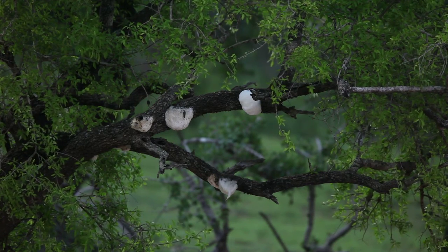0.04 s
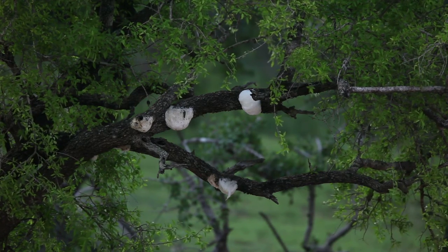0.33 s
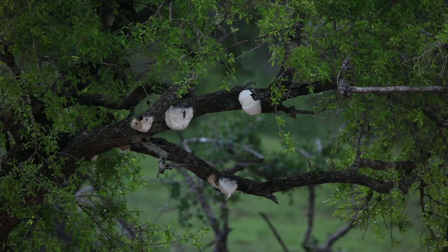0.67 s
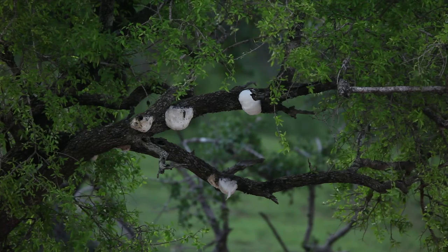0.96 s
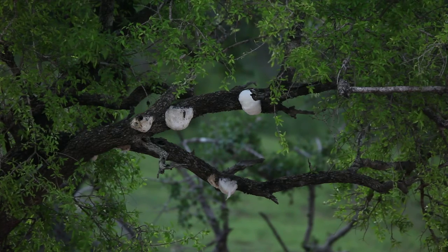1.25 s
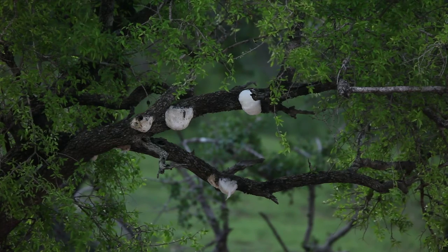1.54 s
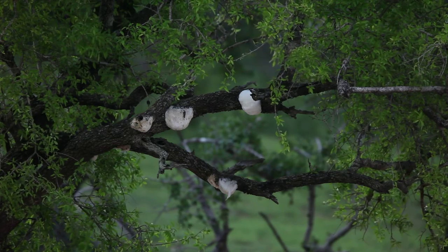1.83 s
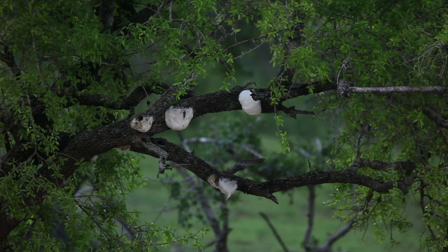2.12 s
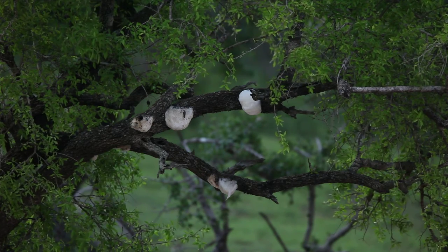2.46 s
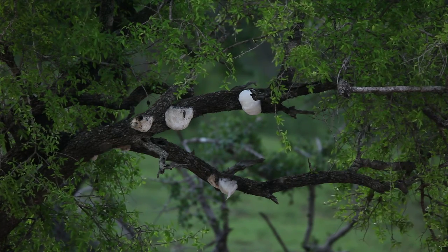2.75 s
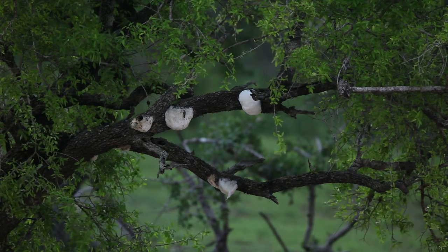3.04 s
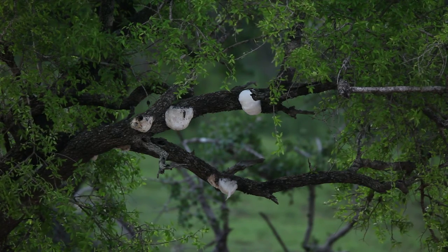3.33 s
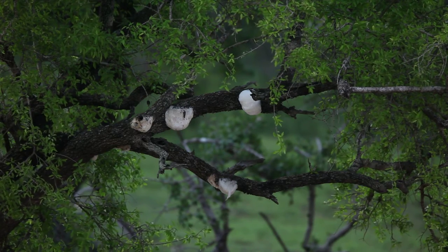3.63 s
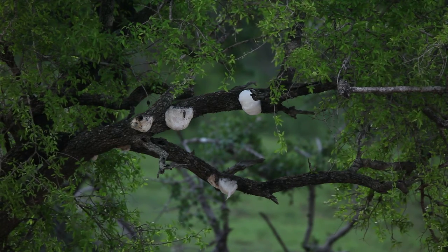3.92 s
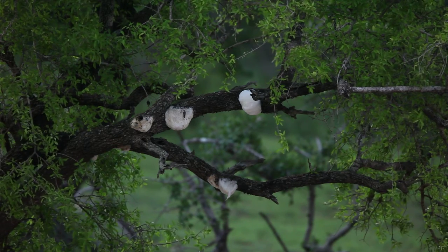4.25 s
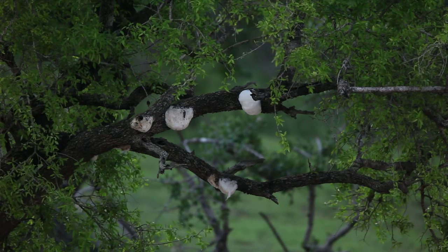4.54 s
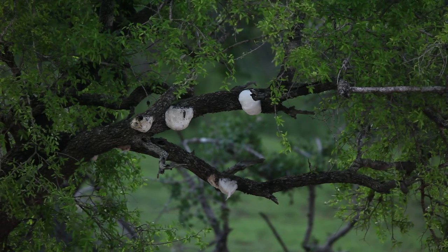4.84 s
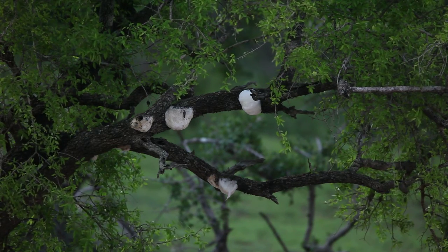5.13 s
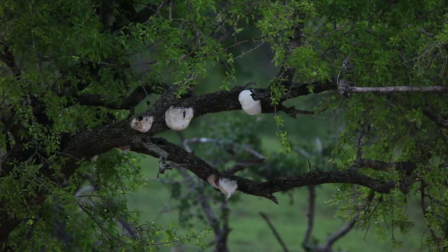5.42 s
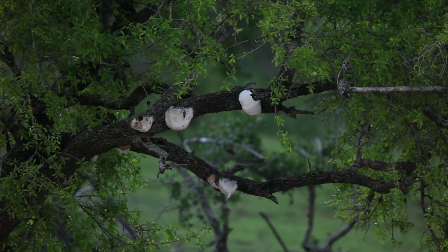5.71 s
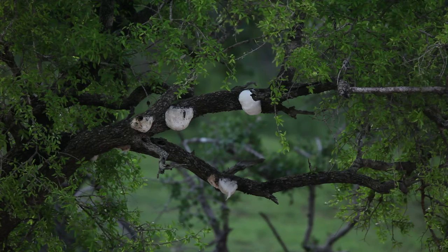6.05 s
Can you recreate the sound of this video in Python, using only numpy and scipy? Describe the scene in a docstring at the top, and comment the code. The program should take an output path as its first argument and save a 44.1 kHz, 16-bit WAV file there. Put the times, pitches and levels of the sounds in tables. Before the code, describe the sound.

Many frogs overlap with liquid rising whoops, dry rattles and shrill peeps outdoors, over faint insects and a soft breeze.

```python
"""A wetland at nightfall, one microphone in the open among a frog chorus. Dozens of frogs give liquid
whoops, tones swept upward through the vocal sac, a few of them close by. One rattles in long, dry click
trains, others peep and chuck, and grass and trees scatter their calls. Thin insect buzzes and brief
whistles sit above a faint rumble and a hiss of air that rises in the second half."""
import sys
import numpy as np
from scipy import signal
from scipy.fft import rfft, irfft
from scipy.io import wavfile

SR = 44100
rng = np.random.default_rng(int(sys.argv[2]) if len(sys.argv) > 2 else 0)


def file_out(sig):
    """Save sig as 16-bit WAV at sys.argv[1]."""
    # one column per channel
    cols = np.atleast_2d(sig).T
    # limit, then scale
    lim = np.clip(cols, -1, 1)
    pcm = np.round(lim * 32767).astype(np.int16)
    wavfile.write(sys.argv[1], SR, pcm)


N = 268128
TIME = np.arange(N) / SR
SWEEP_HZ = 1300  # whoops are timed by when they pass this pitch

# whoops nearest the microphone: (time [s], time per octave [s], top pitch [Hz], relative level [dB])
NEAR_WHOOPS = [(0.015, .059, 1840, -37.5), (0.072, 0.059, 1990, -40), (0.249, 0.071, 1860, -34.5),
               (0.343, .08, 1837, -20.5), (0.463, 0.075, 1833, -19), (0.725, 0.041, 1920, -34.5),
               (0.785, 0.047, 2000, -39.5), (1.123, .068, 2020, -35), (1.185, 0.084, 1810, -36),
               (1.477, 0.071, 1850, -28), (1.595, .05, 1820, -43.5), (1.803, 0.047, 2015, -37.5),
               (1.896, 0.061, 2060, -41), (2.121, 0.064, 1950, -34.5), (2.244, .052, 1956, -32.5),
               (2.356, .072, 1820, -35.5), (2.486, 0.093, 1746, -37), (2.584, 0.048, 1920, -32.5),
               (2.652, 0.056, 1760, -33), (2.773, .066, 1893, -18.5), (2.94, 0.05, 1820, -36),
               (3.035, 0.084, 2140, -37), (3.122, 0.071, 1920, -29), (3.215, 0.044, 2020, -29.5),
               (3.337, 0.061, 1940, -36.5), (3.496, 0.074, 1920, -29.5), (3.53, .063, 2060, -33.5),
               (3.807, 0.063, 1840, -35), (4.055, 0.039, 2100, -41), (4.138, 0.04, 1900, -41.5),
               (4.452, .059, 2004, -35), (4.788, 0.031, 1950, -33.5), (4.94, .081, 2015, -38.5),
               (4.994, 0.058, 2020, -42), (5.096, 0.065, 2210, -40), (5.38, 0.065, 1850, -45),
               (5.504, 0.085, 2050, -40), (5.601, 0.049, 1950, -41), (5.71, 0.069, 2060, -44),
               (5.83, 0.046, 2330, -46), (5.899, 0.049, 2160, -44.5), (6.001, .056, 2000, -40.5)]
def near_whoopers(gain_db=1.5, even_top_hz=1946, strong_echo_s=.025, strong_echo_db=-14):
    """Frogs that stand out of the chorus; the farther off one sits, the more of it arrives as echo."""
    out = np.zeros(N)
    loudest_db = max(row[3] for row in NEAR_WHOOPS)
    for s, octave_s, top_hz, db in NEAR_WHOOPS:
        distance_db = loudest_db - db
        # higher-voiced frogs put their effort late in the sweep
        call, lead_s = whoop(octave_s, top_hz, tilt_db_per_octave=.0637 * (top_hz - even_top_hz))
        call = undb(db + gain_db) * scatter(call, t60=.15, echo_db=-5 + .23 * distance_db, count=24)
        add(out, s - lead_s, call)
        # one stronger echo beats against the sweep and roughens it
        add(out, s - lead_s + strong_echo_s * rng.uniform(.97, 2.3), undb(strong_echo_db) * call)
    return out


# how the vocal sac shapes a whoop along its sweep: (pitch [Hz], gain [dB])
SAC_RESPONSE = [(720, -3.5), (800, -6), (950, -6.5), (1250, 4.5), (1550, 0.5), (1800, 3), (2200, -8)]
def whoop(octave_s, top_hz, tilt_db_per_octave=0, onset_db=0, pulse_hz=90, hold_s=.014, wobble=.03495):
    """A pulsing tone that sweeps up and levels off; returns it and the seconds it takes to SWEEP_HZ."""
    lead_s = octave_s * np.log2(SWEEP_HZ / SAC_RESPONSE[0][0])
    end_s = lead_s + octave_s * np.log2(top_hz / SWEEP_HZ) + hold_s
    t = np.arange(int(end_s * SR)) / SR
    beat = np.cos(2 * np.pi * (pulse_hz * (1 + rng.uniform(-.13, .19)) * t + rng.random()))
    waver = np.interp(t * 110, np.arange(64), rng.standard_normal(64))
    rising_hz = SWEEP_HZ * 2 ** ((t - lead_s) / octave_s) * (1 + wobble * waver)
    hz = rising_hz / (1 + (rising_hz / top_hz) ** 24) ** (1 / 24)  # soft ceiling
    # the larynx stutters most until the pitch is up
    stutter = .94 * np.clip((SWEEP_HZ - hz) / 350, .3, 1)
    pulsing = 1 - stutter * (.5 + .5 * beat)
    fade = np.sin(np.pi / 2 * np.clip(np.minimum(t / .011, (end_s - t) / .018), 0, 1)) ** 2
    db = np.interp(hz, *np.transpose(SAC_RESPONSE))
    db += tilt_db_per_octave * np.log2(np.maximum(hz, 1000) / SWEEP_HZ)
    db += onset_db * np.clip((1150 - hz) / 300, 0, 1)
    return undb(db) * pulsing * fade * tone(hz, octave_db=-40), lead_s


# the crowd of whoopers far across the wetland: (time [s], relative level [dB])
CROWD_LEVEL = [(0.0, -36), (0.41, -38), (0.56, -40.5), (1.05, -37.5), (1.34, -34.5), (1.71, -34.5),
               (1.91, -40.5), (2.17, -40), (2.32, -35), (2.71, -40.5), (3.22, -35.5), (3.84, -39),
               (4.38, -37), (4.83, -44), (5.05, -45), (5.25, -44.5), (6.08, -51)]
def far_whoopers(count=200, gain_db=-1.8, top_hz=2010, spread_db=3.5):
    """Many distant frogs whose whoops reach the microphone as one bubbling wash."""
    out = np.zeros(N)
    for k, (when, slowness, pitch, size) in enumerate(rng.uniform(-1.1, 1, (count, 4))):
        call, lead_s = whoop(.058 * (1 + .27 * slowness), top_hz * (1 + .06 * pitch), onset_db=8)
        start_s = (k + 2 * when) / count * N / SR - lead_s
        add(out, start_s, undb(spread_db * size) * scatter(call, t60=.25, echo_db=6, count=40))
    # the soft ground swallows the low start of distant calls
    return unit(butter(out, 2, 1050, "high")) * undb(curve(CROWD_LEVEL) + gain_db)


# ring of the rattling frog's sac: (frequency [Hz], half length [s], relative level [dB])
CLICK_MODES = [(4324, 0.00084, 17.5), (3510, 0.00087, -1), (8580, 0.0009, -13)]
# its bouts of rattling, one list each: (time [s], level [dB])
RATTLE_BOUTS = [
    [(.015, -33.5), (.2, -36), (.33, -38), (.42, -50)],
    [(2.0617, -51), (2.13, -44), (2.18, -37.5), (2.28, -36), (3.0, -37), (3.7, -37.5), (4.28, -36),
     (4.38, -49.5)],
    [(5.9, -50), (6.0, -37.5), (6.08, -39)],
]
def rattler(rate_hz=69.4, uneven_db=1.85, jitter_s=.00013, stray_db=-11.5, clicks_per_cycle=4):
    """Evenly spaced clicks ring a small vocal sac; weaker stray clicks and echoes fill the gaps."""
    out = np.zeros(N)
    t = np.arange(-160, 160) / SR
    for bout in RATTLE_BOUTS:
        times, levels = np.transpose(bout)
        for s in np.arange(times[0], times[-1], 1 / rate_hz):
            for k, (late, size) in enumerate(rng.standard_normal((clicks_per_cycle, 2))):
                stray = k > 0  # strays vary more in pitch and timing
                tune = 1 + rng.uniform(-1, 1) * (.13 if stray else .02)
                click = sum(undb(db) * np.exp(-(t / half_s) ** 2) * np.sin(2 * np.pi * hz * tune * t)
                            for hz, half_s, db in CLICK_MODES)
                click *= np.sqrt(SR / rate_hz) / np.linalg.norm(click)  # rms 1 over a cycle
                delay_s = k / clicks_per_cycle / rate_hz + late * (jitter_s + .002 * stray)
                click_db = np.interp(s, times, levels) + uneven_db * size + stray * stray_db
                add(out, s + delay_s + t[0], click * undb(click_db))
    return scatter(out, t60=.12, echo_db=-3, count=200)[:N]


# phrases of peeps from the grass: (start [s], peeps [count], spacing [s], peep length [s], pitch [Hz],
# fall within a peep [Hz], relative level of the last peep [dB])
PEEP_PHRASES = [(0.293, 2, 0.066, 0.039, 5560, 698, -38.5), (0.417, 1, 0, 0.044, 4120, -2, -39.5),
                (0.598, 2, 0.06, 0.049, 5500, 306, -44), (0.846, 2, 0.074, 0.032, 5350, 130, -45),
                (1.562, 2, 0.072, 0.041, 5360, 618, -40), (1.691, 1, 0, 0.11, 5580, 3, -43),
                (1.791, 2, 0.077, 0.055, 5375, 573, -39), (1.974, 1, 0, 0.029, 4226, 83, -39.5),
                (2.071, 2, 0.079, 0.04, 5410, 552, -36.5), (2.93, 6, 0.041, 0.033, 5280, 269, -36),
                (3.608, 3, 0.087, 0.086, 5575, 162, -36), (4.012, 5, .069, 0.064, 5415, 23, -34),
                (4.482, 2, 0.059, 0.05, 5580, 320, -43.5), (4.996, 3, 0.076, 0.0505, 5575, 243, -34.5),
                (5.345, 8, 0.044, 0.0362, 5194, 332, -36), (5.628, 2, .02, 0.0082, 4215, 67.5, -31),
                (5.842, 1, 0.019, 0.023, 5050, 400, -45)]
# soft trills between them: (start [s], pitch [Hz], relative level [dB])
SOFT_TRILLS = [(0.824, 4150, -52.5), (1.268, 5480, -50), (1.42, 4100, -51.5), (2.011, 3830, -44.5),
               (2.212, 5650, -45.5), (2.713, 5550, -47.5), (4.469, 4120, -49.5), (4.781, 5500, -47),
               (4.968, 4170, -51)]
def peepers(gain_db=3, crescendo_db=3, trill_s=.15, sac_top_hz=5750):
    """Small frogs give mostly falling peeps, each louder through a phrase, and trills around one pitch."""
    out = np.zeros(N)
    for start, peeps, spacing_s, length_s, hz, fall_hz, last_db in PEEP_PHRASES:
        for k in range(peeps):
            effort_db = last_db - crescendo_db * (peeps - 1 - k)
            add(out, start + k * spacing_s, undb(effort_db + gain_db) * peep(length_s, hz, fall_hz))
    for start, hz, db in SOFT_TRILLS:
        add(out, start, undb(db + gain_db) * peep(trill_s, hz, fall_hz=0, waver=.044))
    # the vocal sac radiates little above its resonance, apart from a faint octave
    return butter(out, 16, sac_top_hz, "low") + butter(out, 6, 9000, "high")


def peep(length_s, hz, fall_hz, waver=.035):
    """One shrill, raspy note blurred by vegetation; the farther it falls, the brighter its octave."""
    call = glide(length_s, hz, hz - fall_hz, waver, rasp_db=12, octave_db=-38 + .014 * fall_hz)
    return scatter(call, t60=.14, echo_db=-3, count=100)


# runs of dry chucks: (start [s], chucks [count], spacing [s], resonance [Hz], relative level [dB])
CHUCK_RUNS = [(0.071, 5, 0.068, 3560, -40), (1.578, 4, 0.063, 3950, -45), (2.899, 6, 0.07, 3420, -43.5),
              (3.885, 4, 0.067, 3800, -39), (4.639, 5, .067, 3800, -47), (5.097, 5, 0.059, 3780, -45.5),
              (5.384, 1, 0, 3800, -41), (5.432, 1, 0, 4020, -34.5), (5.497, 3, .075, 3870, -37.5),
              (5.765, 3, .068, 3850, -39.5)]
def chuckers(click_gap_s=.004, width_hz=950, gain_db=-2.6, rise_db=.05):
    """Each chuck is a roll of four clicks through a broad throat resonance; a run stays nearly level."""
    out = np.zeros(N)
    for start, chucks, spacing_s, hz, db in CHUCK_RUNS:
        for k in range(chucks):
            click_times = (np.arange(4) + .3 * rng.random(4)) * click_gap_s
            clicks = np.zeros(int(.043 * SR))
            clicks[(click_times * SR).astype(int)] = [.84, .75, .98, .32]
            chuck = scatter(unit(resonate(clicks, hz, width_hz)), t60=.089, echo_db=1.5, count=120)
            add(out, start + k * spacing_s - click_gap_s / 2, undb(db + gain_db + rise_db * k) * chuck)
    return butter(out, 4, [2950, 4500], "band")


# thin insect buzzes: (start [s], end [s], band centre [Hz], level it swells toward [dB])
INSECT_BUZZES = [(.15, 0.572, 6660, -49), (0.495, 0.713, 6700, -53), (2.048, 2.42, 6700, -48.5),
                 (2.45, 2.856, 6700, -56.5), (3.445, 3.807, 6750, -49.5), (4.35, 4.807, 6530, -52.5),
                 (4.92, 5.277, 6770, -48)]
def insects(stroke_hz=80, width_hz=560, swell_db=9):
    """Wing strokes rasp in a narrow band, growing until they stop."""
    out = np.zeros(N)
    strokes = 1 + .16 * np.sin(2 * np.pi * stroke_hz * TIME)
    for start, end, hz, db in INSECT_BUZZES:
        rasp = band_noise(hz, width_hz) * strokes
        gate = np.clip((TIME - start) / .11, 0, 1) * np.clip((end - TIME) / .066, 0, 1)
        remaining = np.clip((end - TIME) / (end - start), 0, 1)
        out += rasp * gate * undb(db - swell_db * remaining)
    return out


# squeaks and whistles from the trees: (start [s], length [s], first pitch [Hz], last pitch [Hz],
# level [dB])
WHISTLE_NOTES = [(0.97, 0.45, 3390, 3360, -63.5), (3.712, 0.032, 2640, 2620, -56),
                 (4.1, 0.046, 2650, 2970, -55), (5.427, 0.037, 2330, 2460, -48.5),
                 (5.773, 0.054, 2760, 2730, -38)]
def whistler():
    """Clear notes, most of them faint, that linger between the trunks."""
    out = np.zeros(N)
    for s, length_s, first_hz, last_hz, db in WHISTLE_NOTES:
        note = glide(length_s, first_hz, last_hz, waver=.018, rasp_db=4, octave_db=-40)
        add(out, s, undb(db) * scatter(note, t60=1, echo_db=-9, count=200))
    return out


# flurries of twittering far off: (time of peak [s], half length [s], level [dB])
TWITTER_FLURRIES = [(.45, 0.16, -43), (3.1, 0.19, -46), (4.2, 0.2, -38.5), (5.58, 0.2, -38.5),
                    (6.02, .1, -44)]
def far_twitter(hz=5200, width_hz=750, flicker_db=3):
    """Far peeps overlap into a flickering band of noise that swells and fades."""
    return band_noise(hz, width_hz) * swells(TWITTER_FLURRIES) * undb(flicker_db * wander(45))


# high-voiced frogs at the back of the chorus: (centre [Hz], width [Hz], level [dB])
FAR_FROG_BANDS = [(3230, 620, -67.5), (3998, 690, -57), (5370, 540, -54)]
def far_frogs(flicker_db=6):
    """With distance, peeps and rattles merge into shimmering bands of noise."""
    return sum(unit(resonate(rng.standard_normal(N), hz, width_hz)) * undb(db + flicker_db * wander(24))
               for hz, width_hz, db in FAR_FROG_BANDS)


# low puffs of air at the microphone: (time of peak [s], half length [s], level [dB])
AIR_PUFFS = [(0.505, 0.014, -50), (0.805, 0.087, -59), (5.52, 0.021, -51)]
# rumble of still air over the wetland: (frequency [Hz], relative level [dB])
STILL_AIR_SPECTRUM = [(20, -14), (35, -8), (60, 1.5), (110, -2), (190, -2), (240, -7), (600, -9),
                      (2500, -16.5), (5000, -10), (8000, -16), (11000, -24.5), (15500, -28.5)]
# hiss of the breeze: (frequency [Hz], relative level [dB])
BREEZE_SPECTRUM = [(30, -19), (100, -2.5), (185, 3.5), (245, -2), (400, 0), (800, -4), (2500, -13),
                   (6000, -8.5), (8500, -11), (11000, -24.5), (15500, -49)]
# strength of that hiss: (time [s], level [dB])
BREEZE_LEVEL = [(0, -61), (2.8, -76), (3.6, -56), (4.3, -49.5), (5.2, -47.5), (6.08, -48.5)]
def air(still_db=-52):
    """A faint steady rumble with a few low puffs, and a soft breeze that rises later on."""
    puffs = swells(AIR_PUFFS) * unit(resonate(rng.standard_normal(N), hz=43, width_hz=80))
    rumble = shaped_noise(STILL_AIR_SPECTRUM) * undb(still_db)
    hiss = shaped_noise(BREEZE_SPECTRUM) * undb(curve(BREEZE_LEVEL))
    return puffs + rumble + hiss


def scatter(x, t60, echo_db, count):
    """The direct sound plus single echoes from stems and trunks, which fade by 60 dB in t60 seconds."""
    offset, size = rng.random(count), rng.standard_normal(count)
    lag_s = .002 + t60 * .7 * (np.arange(count) + offset) / count
    size *= undb(-60 * lag_s / t60)
    response = np.zeros(int(lag_s[-1] * SR) + 1)
    response[(lag_s * SR).astype(int)] = undb(echo_db) * size / np.linalg.norm(size)
    response[0] = 1
    return signal.fftconvolve(x, response / np.linalg.norm(response))


def glide(length_s, first_hz, last_hz, waver, rasp_db, octave_db):
    """A short tone of rms 1 that slides ever faster, trembling in pitch and strength."""
    progress = np.linspace(0, 1, int(length_s * SR))
    tremble, rasp = (np.interp(progress * length_s * 800, np.arange(512), row)
                     for row in rng.uniform(-1, 1, (2, 512)))
    hz = (first_hz + (last_hz - first_hz) * progress ** 1.245) * (1 + waver * tremble)
    strength = np.abs(np.sin(np.pi * progress)) ** .5 * undb(rasp_db * rasp)
    return unit(strength * tone(hz, octave_db))


def tone(hz, octave_db):
    """A sine and its octave, following a pitch curve."""
    phase = 2 * np.pi * np.cumsum(hz) / SR
    return np.sin(phase) + undb(octave_db) * np.sin(2 * phase)


def resonate(x, hz, width_hz):
    """A resonance applied twice, for steep skirts."""
    b, a = signal.iirpeak(hz, hz / width_hz, fs=SR)
    return signal.lfilter(b, a, signal.lfilter(b, a, x))


def butter(x, order, hz, kind):
    """A low-, high- or band-pass with a flat passband."""
    return signal.sosfilt(signal.butter(order, hz, kind, fs=SR, output="sos"), x)


def band_noise(hz, width_hz):
    """Noise of rms 1 in one band."""
    return unit(butter(rng.standard_normal(N), 3, [hz - width_hz / 2, hz + width_hz / 2], "band"))


def shaped_noise(spectrum):
    """Noise of rms 1 shaped by (frequency [Hz], level [dB]) rows."""
    hz, db = np.transpose(spectrum)
    bin_hz = np.maximum(np.arange(N // 2 + 1) * SR / N, 1)
    gain = undb(np.interp(np.log(bin_hz), np.log(hz), db))
    return unit(irfft(rfft(rng.standard_normal(N)) * gain, N))


def wander(rate_hz):
    """A random drift with a spread near 1."""
    return 1.2 * np.interp(TIME * rate_hz, np.arange(2048), rng.standard_normal(2048))


def swells(rows):
    """Gain that rises and falls around each (time [s], half length [s], level [dB]) row."""
    return sum(undb(db) * np.exp(-((TIME - s) / half_s) ** 2) for s, half_s, db in rows)


def curve(rows):
    """Join (time [s], level [dB]) rows by straight lines."""
    return np.interp(TIME, *np.transpose(rows))


def add(out, start_s, x):
    """Mix a sound in at a time."""
    i = int(start_s * SR)
    lo, hi = max(i, 0), min(i + len(x), N)
    if hi > lo:
        out[lo:hi] += x[lo - i:hi - i]


def undb(db):
    """Decibels to gain."""
    return 10 ** (np.asarray(db) / 20)


def unit(x):
    """Scale to rms 1."""
    return x / np.sqrt(np.mean(x ** 2) + 1e-18)


def scene():
    """The wetland from one spot in the open; the trees return a faint, long echo of the chorus."""
    calls = near_whoopers() + far_whoopers() + rattler() + peepers() + chuckers()
    chorus = scatter(calls, t60=.58, echo_db=-24.5, count=400)[:N]
    return (chorus + whistler() + insects() + far_frogs() + far_twitter() + air())[None]


def record(dry):
    """One microphone into a recorder that cuts steeply above 15.7 kHz."""
    return signal.sosfilt(signal.ellip(10, .1, 70, 15700, fs=SR, output="sos"), dry)


dry = scene()
out = record(dry)
file_out(out)
```